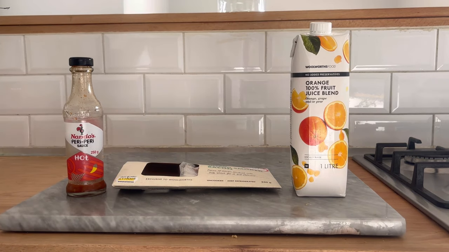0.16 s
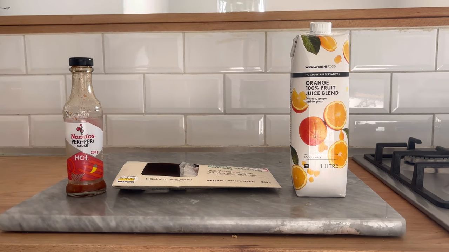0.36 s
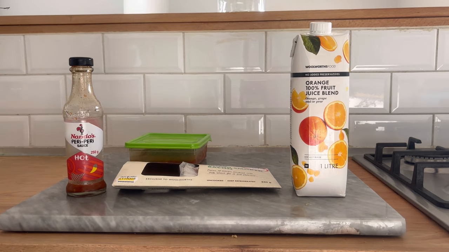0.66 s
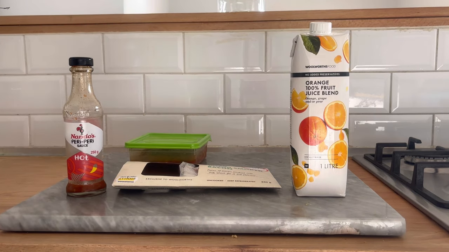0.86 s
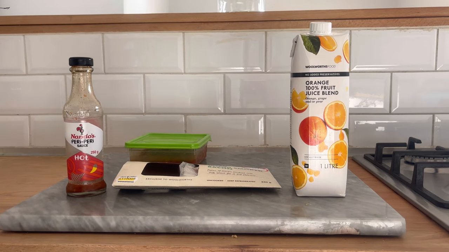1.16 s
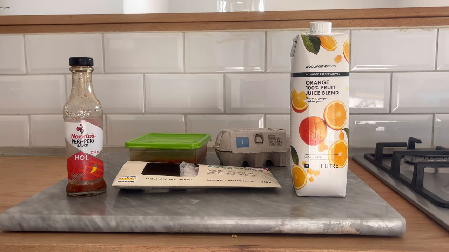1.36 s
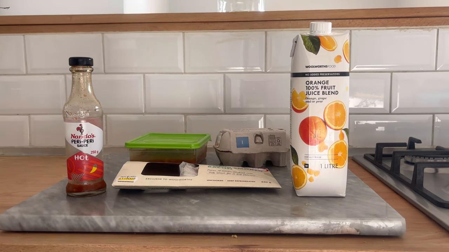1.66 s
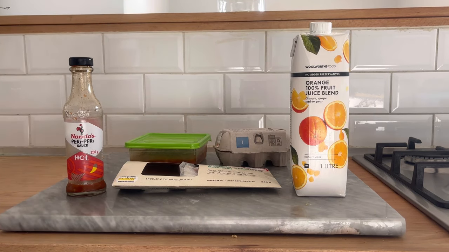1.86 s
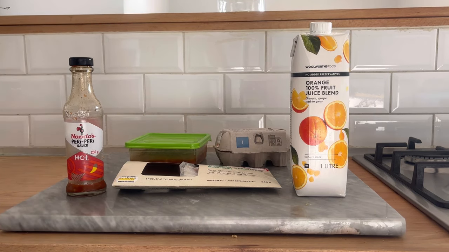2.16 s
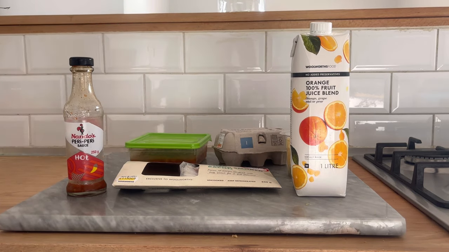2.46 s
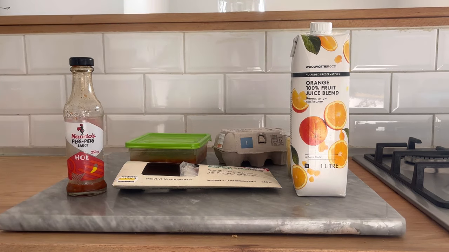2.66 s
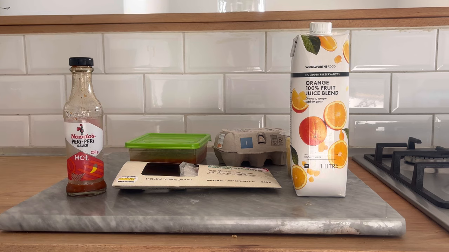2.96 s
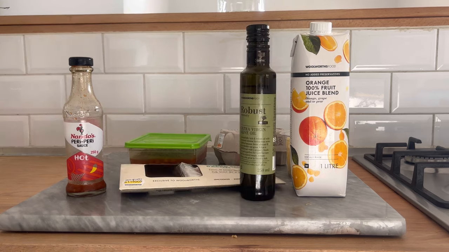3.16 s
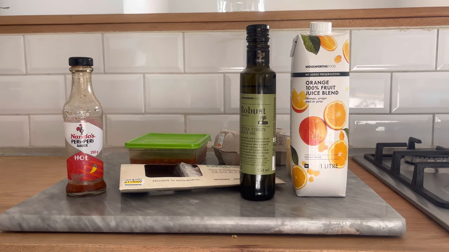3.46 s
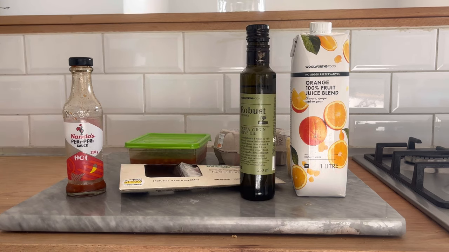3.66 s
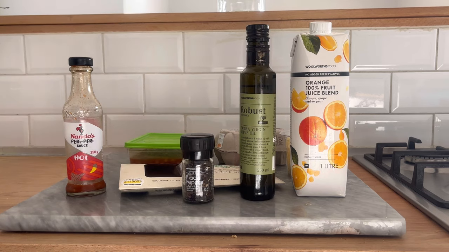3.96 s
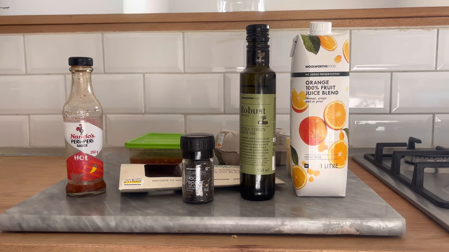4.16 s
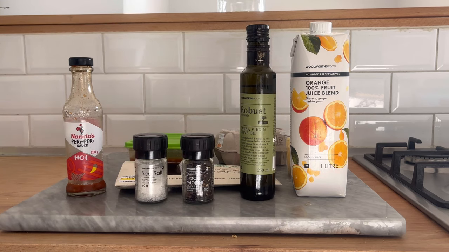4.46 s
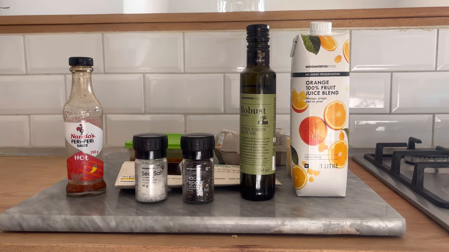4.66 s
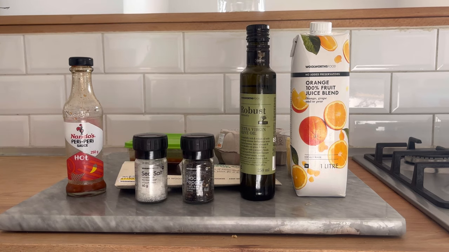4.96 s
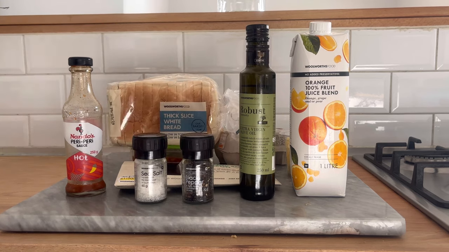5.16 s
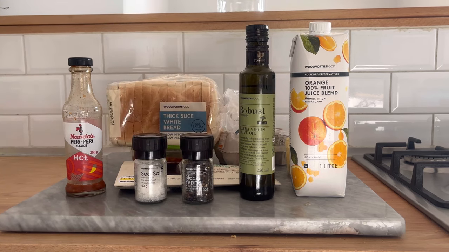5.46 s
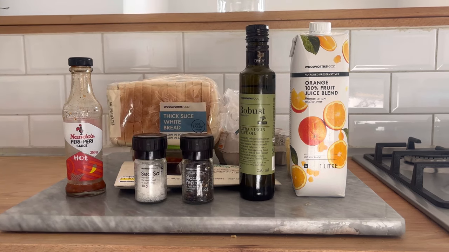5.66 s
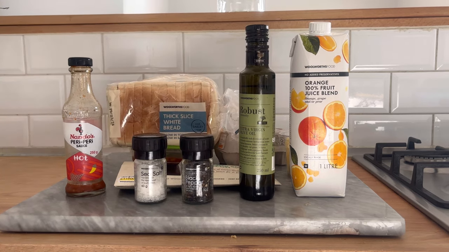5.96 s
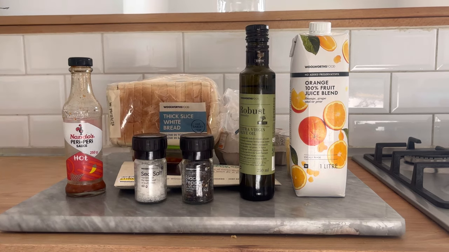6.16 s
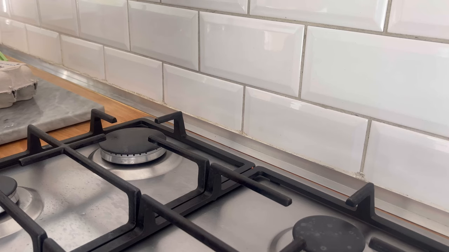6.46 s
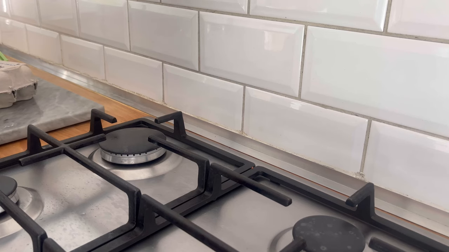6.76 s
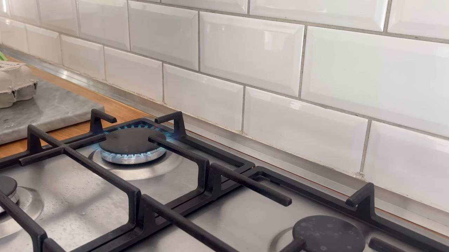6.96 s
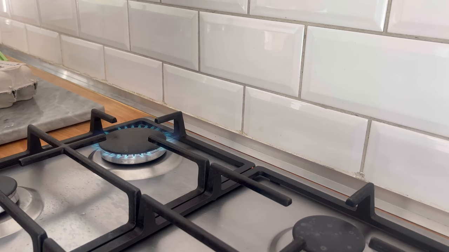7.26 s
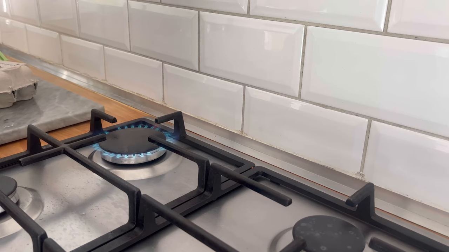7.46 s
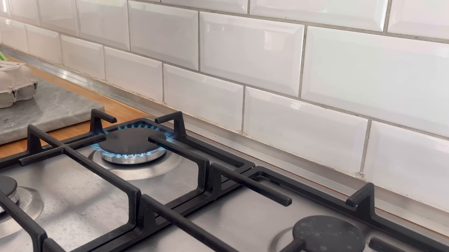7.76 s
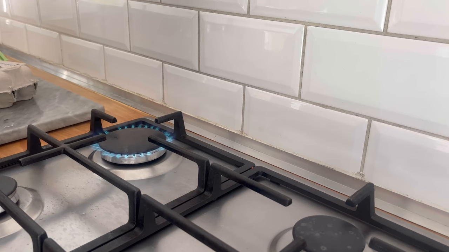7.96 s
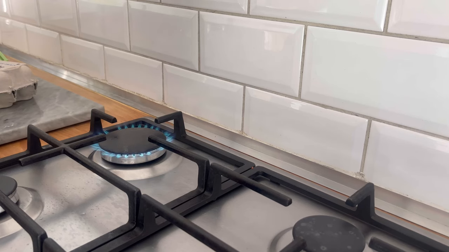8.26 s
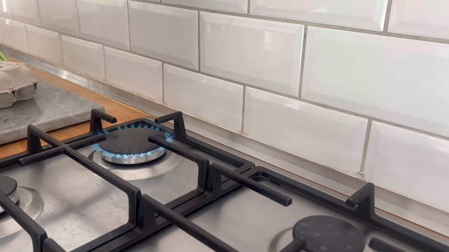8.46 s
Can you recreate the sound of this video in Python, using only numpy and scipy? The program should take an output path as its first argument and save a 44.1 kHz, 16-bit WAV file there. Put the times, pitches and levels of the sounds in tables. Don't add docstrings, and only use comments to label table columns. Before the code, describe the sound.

Close kitchen foley in hard-cut takes over faint room tone. At 0.1 s a fridge door seal lets go with a crisp snap, and the cabinet booms briefly. From 0.5 to 1 s a lidded box and packs snap, scrape and knock hollowly on a stone slab, with a firm thud and rustle at 1.2 s. It is nearly quiet until small clicks at 2.3-2.5 s and a soft low set-down at 2.7 s. At 3.1-3.3 s a tub and carton knock; at 3.55 and 3.8 s glass clinks with short damped rings. From 4.8 to 6.1 s a bread bag thumps softly, crinkles and crackles. At 6.2 s gas hisses with a faint tube hum; from 6.3 s loud, bright igniter clicks repeat every 0.26 s, ringing off metal and tiles. Around 6.9 s flame catches with a low whump, then roars softly to the end, with small knocks near 8.4 s.

```python
import sys
import numpy as np
from scipy import signal
from scipy.fft import rfft, irfft, next_fast_len
from scipy.io import wavfile
from scipy.ndimage import uniform_filter1d

SR = 44100
rng = np.random.default_rng(int(sys.argv[2]) if len(sys.argv) > 2 else 0)


def digitize_waveform(pressure):
    field = np.atleast_2d(pressure).T
    bounded = np.clip(field, -1, 1)
    quanta = np.round(bounded * 32767).astype(np.int16)
    wavfile.write(sys.argv[1], SR, quanta)


def boost_factor(decibels):
    exponent = np.asarray(decibels, float) / 20
    return 10 ** exponent


N = 380134
T = np.arange(N) / SR

TAKE_STARTS = [.4595, 1.36, 2.206, 3.028, 3.883, 4.44, 5.089, 6.202]

# start_s, knock_db, rumble_over_knock_db, t60_s
BUMPS = [(0, -54, 1.5, 2.6), (0.099, -43.5, -9, 0.67), (0.469, -52, -5, 9), (.495, -46, -9, 2),
         (.58, -41, -3, 0.91), (.862, -48, -8, 1.7), (1.216, -41.5, -13, 0.46), (1.235, -43.5, -2.5, 1.1),
         (1.38, -74.5, -4, 10), (2.168, -62, -23, 2), (2.215, -58.5, 3.5, 4.8), (2.741, -59, 12, .45),
         (3.072, -61.5, 0, 2), (3.103, -54, -7, 0.92), (3.3, -48, -12, .8), (3.345, -50, 1.5, 0.77),
         (3.567, -59, 5, 0.9), (3.79, -51.5, 1, 1), (3.83, -47, 4, 1.9), (3.89, -58.5, -22, 0.73),
         (4.05, -71.5, -3, 4.3), (4.46, -77, 2, 30), (4.8, -54, -15, 2), (4.846, -46, -5, 5),
         (4.89, -43, -4.5, 0.81), (5.097, -54, 3, 2), (5.243, -51.5, 2, 1.47), (5.49, -60.5, 5, 8.2),
         (5.87, -52.5, 1, 0.83)]
# peak_s, scrape_db,
# rustle_over_scrape_db, climb_20db_s, t60_s
SLIDES = [(0, -54, 0, .01, 3.2), (.096, -40, -2, 0.13, 0.66), (.508, -41.5, -4.5, 0.04, 0.22),
          (.531, -47.5, -5, .1, 2), (.558, -42, -7, .04, .25), (.6, -45.5, -6, 0.08, 0.5),
          (.656, -50, -5.5, .2, 2), (.709, -43, -5, .03, .35), (.755, -44, -5, .15, 0.45),
          (.866, -45.5, -7, 0.04, 1), (.96, -48.5, -1.5, -2.8, 0.64), (1.213, -47.5, 0, .002, 0.23),
          (1.355, -49, -1, .5, 1), (1.79, -81, 2.5, .5, 2.1), (2.17, -54.5, 0.5, .004, 9),
          (2.23, -71.5, -6.5, .05, 4.3), (2.53, -72, 1, 0.2, 1), (2.715, -54, -5.5, 0.26, 0.38),
          (2.94, -72.5, 1.5, 0.5, 1.5),
          (3.105, -66, -0.5, 0.07, 0.91), (3.297, -60.5, -5, 0.0033, 0.51),
                 (3.56, -58.5, -9, 0.017, .9), (3.786, -52, -23, .004, 0.68),
                 (3.837, -54, -22, 0.058, 0.33), (3.9, -73.5, 3, 0.043, 0.95), (4.05, -84.5, 9, .01, 1),
                 (4.47, -86.5, 4, .02, 1.5),
          (4.8, -65.5, -17, .01, .6), (4.843, -58, -7, .01, 1.1), (4.904, -49.5, 1.5, 0.09, 0.42),
              (5.085, -54, 2.5, 0.22, 1.1), (5.132, -63.5, 0.5, 0.13, 0.93), (5.243, -56.5, -1, .04, 1.9),
              (5.5, -56.5, 0, 0.036, 3), (5.61, -46, -4, 0.16, 1), (5.8, -45, -7.5, 0.22, 1.3),
              (5.891, -42.5, -7, 0.21, 0.47), (5.99, -56.5, -6.5, .1, 1.75)]
# freq_hz, level_db_per_hz
RUMBLE_COLOUR = [(35, -36.5), (65, -3.5), (100, -4), (200, -6), (300, -7), (500, -58)]
KNOCK_COLOUR = [(130, -31), (250, 1), (600, -2), (1200, -6.5), (3500, -35.5)]
SCRAPE_COLOUR = [(600, -32.5), (1500, 0.5), (3000, 1), (5500, -4.5), (12000, -29)]
RUSTLE_COLOUR = [(3000, -18), (6500, 5.5), (10000, 5), (14000, -26)]
SHEEN_COLOUR = [(8000, -18.5), (11500, -3.5), (15700, -6.5), (16200, -41.5)]
# freq_hz, level_db_per_hz
CRINKLE_COLOUR = [(700, -27), (1700, -2.5), (3300, 0), (5000, -1), (12000, -26)]

# freq_hz, width_hz, level_db
CABINET_MODES = [(326, 30, 5), (247, 45, -3), (190, 15, -6.5), (1480, 90, -17.5), (800, 60, -20.5)]
# time_s, level_db
CABINET_LEVEL = [(0.0, -43.5), (0.188, -42), (0.2, -37), (0.34, -48.5), (0.459, -60)]

# freq_hz, level_db_per_hz
AIR_COLOUR = [(24, -41.5), (40, -5), (99, -0.5), (354, -24), (444, -9.5), (620, -24.5), (6650, -31),
              (16000, -44.5)]

# start_s, peak_db, centre_hz
SNAPS = [(0.0654, -27, 9000), (0.0685, -26, 4000), (0.0866, -11.5, 10300), (0.0905, -16, 9500),
         (0.0905, -24, 4500), (0.091, -24.5, 1600), (0.4394, -55, 3200), (0.4992, -34.5, 1200),
         (0.5047, -33.5, 1500), (0.569, -30, 1100), (0.61, -33, 3000), (0.7028, -33.5, 1100),
         (0.7555, -35, 5000), (0.8592, -33, 1050), (0.893, -36, 3200), (0.5586, -29, 2620),
         (0.5942, -31.5, 3350), (0.7464, -36, 3410), (1.215, -33, 5380), (1.3025, -37, 3730),
         (1.3437, -35, 2800), (1.3517, -32.5, 3000), (1.79, -53.5, 4000), (2.2702, -52, 3190),
         (2.3575, -49.5, 3440), (2.4319, -42.5, 5470), (2.5174, -51, 6130), (2.5274, -41, 4910),
         (2.5394, -45, 5740), (2.9303, -52, 4570), (2.9372, -47, 4030), (3.88, -41, 3560),
         (4.8445, -44, 11400), (4.8894, -31, 13200), (4.891, -35, 6500), (5.2276, -36, 6500),
         (5.2666, -37.5, 10200), (5.2918, -35, 5500), (5.3328, -38, 4050), (5.4946, -44, 2300),
         (5.5047, -43, 2300), (5.5127, -41, 4680), (5.515, -41.5, 2300), (5.59, -35, 3700),
         (5.701, -38, 6500), (5.81, -34, 4500), (5.889, -37, 5000), (6.101, -39, 6000)]
# start_s, peak_db, pitch_hz,
# t60_s, stops_after_s
THUDS = [(1.214, -34, 580, 0.068, .05), (1.227, -29.5, 100, 0.1, 0.046), (1.216, -35.5, 940, .04, .012),
         (1.302, -36.5, 830, 0.05, 0.012), (2.737, -37.5, 98, 0.65, 0.086), (3.298, -40, 710, 0.13, .1),
         (3.834, -38, 115, 0.26, 0.051), (5.255, -42, 117, 0.35, 0.13), (5.416, -38, 300, 0.054, .04),
         (5.874, -37, 216, 0.084, 0.055), (8.389, -42, 1050, .1, 0.017), (8.392, -45.5, 550, .1, 0.019),
         (8.4, -38, 226, 0.22, 0.035), (8.455, -42, 130, .3, .03), (8.476, -40, 1160, .04, .012),
         (8.484, -41, 580, 0.067, .015), (6.858, -30.5, 435, 0.055, 0.014), (6.888, -27, 148, .2, 0.016),
         (6.905, -22.5, 166, .12, .02), (6.933, -28.5, 169, .3, .045), (6.932, -41, 1390, .06, .012),
         (3.068, -51.5, 322, .4, 0.032), (3.105, -48, 330, .3, .06), (.473, -49, 780, .3, .02)]

# time_s, pitch_hz, level_db
BOX_HOLLOW = [(.545, 2600, -55), (.558, 2318, -39), (.572, 1188, -39.5), (.59, 599, -41.5), (.64, 503, -56),
              (.76, 866, -43.5), (.85, 1000, -55), (.865, 1043, -44), (.91, 1020, -56)]
LID_RIM = [(.69, 3050, -66), (.71, 3100, -55), (.74, 3250, -52), (.77, 3250, -54), (.8, 3200, -66)]
BAG_SQUEAK = [(4.63, 2680, -98), (4.68, 2660, -84), (4.76, 2600, -82), (4.81, 2520, -77), (4.83, 2500, -95)]
BAG_POCKET = [(5.55, 4000, -68), (5.6, 3700, -50), (5.64, 3500, -54), (5.68, 3300, -66), (5.75, 3200, -53),
              (5.8, 3200, -46.5), (5.845, 2500, -53), (5.9, 2300, -55), (5.94, 2200, -68)]
BAG_CREASE = [(5.52, 2300, -66), (5.58, 2260, -55), (5.63, 1900, -54), (5.67, 1890, -66)]

# freq_hz, level_db
BOTTLE_MODES = [(1690, -7), (1922, -5), (2080, -9), (2374, -3), (2575, -8), (2729, -8), (2893, -9),
                (3725, 2.5), (4727, -5), (4781, -5), (5464, -11), (6815, -8), (7084, -1), (11160, -14)]
JAR_MODES = [(1195, 4), (1750, 0), (2525, -1), (3068, -3), (8500, -10), (9100, -6), (9500, -1), (9850, -8),
             (10500, -12), (11300, -17)]
TUB_MODES = [(1350, 2), (2300, 2.5), (2580, -5), (3500, -8), (6900, -10)]
NECK_MODES = [(4780, 1), (5480, -21), (7080, -7), (13900, -18)]
SHOULDER_MODES = [(8800, -3), (9100, -4), (9450, 2), (9800, -2), (11900, -3), (12100, -4), (12600, -2),
                  (13900, -10), (14590, -8)]
CARTON_MODES = [(285, -9), (388, -4.5), (732, 0.5), (974, -5), (1136, -9), (1453, -11), (2223, -12)]
BLUR_HZ = [170, 450, 300, 100, 300, 90]
STEADY_SHARE = [.7, .2, .4, 1.1, .3, .8]
# start_s, level_db, rise_s, t60_s, object_index (1.5 rounds to tub)
CLINKS = [
    (3.101, -61.5, 0.009, 0.24, 2),
    (3.297, -60, 0.0022, 0.28, 2),
    (3.297, -51, .002, .3, 5),
    (3.549, -51, 0.011, 0.47, 0),
    (3.55, -61, 0.011, 0.47, 4),
    (3.79, -65, .01, .5, 4),
    (3.786, -54, 0.0083, 0.88, 3),
    (3.787, -50.5, 0.0062, 0.46, 1.5),
    (3.824, -43, 0.005, 0.37, 1),
    (3.889, -65, 0.0082, 0.54, 2),
]

# time_s, hiss_db
GAS_FLOW = [(6.202, -45), (6.22, -44), (6.25, -45.5), (6.3, -50), (6.6, -50), (7.3, -57.5), (8.62, -56)]
# freq_hz, level_db_per_hz
HISS_COLOUR = [(880, -37), (1500, -12.5), (3090, -11), (3380, -6.5), (5170, -4.5), (8920, 2), (16000, -27)]
# freq_hz, width_hz, level_db
TUBE_MODES = [(1235, 310, 0), (431, 32, -4)]
# peak_s, roar_db, flutter_over_roar_db,
# climb_20db_s, t60_s
FLAME_PUFFS = [(6.3, -71, 6, .1, 30), (6.862, -38.5, -4.5, 0.02, 0.5), (6.905, -31.5, -9.5, 0.6, 0.68),
               (6.96, -34, -5.5, 0.3, 0.27), (8.05, -61, -1, 1.5, 0.84), (8.398, -52, 3, 0.03, 0.12),
               (8.482, -53, 3, 0.04, 0.12), (8.6, -46.5, -13, 2, 3)]
# freq_hz, level_db_per_hz
ROAR_COLOUR = [(18, -55), (30, -40.5), (70, -1), (119, 2.5), (200, -2.5), (312, -10.5), (520, -17.5),
               (880, -120)]
FLUTTER_COLOUR = [(200, -35.5), (330, -2), (600, -8), (1000, -10), (1600, -12.5), (3500, -31)]

# start_s, peak_db
SPARKS = [(6.3065, 0), (6.5824, 0), (6.8439, 1), (7.1042, -0.5), (7.365, -0.55), (7.6407, -0.7),
          (7.902, -0.5), (8.163, -0.4), (8.4391, -1)]
# freq_hz, level_db_per_hz
SPARK_COLOUR = [(300, -100), (1000, -31), (1800, -29), (2200, -12.5), (3530, -11), (10400, -10),
                (15800, -11), (16900, -14)]
# delay_ms, level_db
GRATE_ECHOES = [(0.0, 2.5), (0.158, 3.5), (0.279, -3.5), (0.518, 3.5), (0.84, -9), (1.119, 5.115),
                (1.314, 1.4), (1.776, -3.5), (1.966, -5), (2.526, -8), (2.676, -3.5), (3.531, -5),
                (4.243, -5), (4.864, -11)]
# freq_hz, width_hz, level_db
CAP_MODES = [(9569.84, 220.0, 12.5), (8250, 200, 4.5), (12095.5, 590, 7.041), (6480, 320, 7.695),
             (15900, 500.0, 4), (4853.32, 910, 4)]
# time_ms, level_db
WALL_BUILD = [(0, -14.5), (5, -30), (8, -40), (11, -34), (13, -29.5), (17, -28), (19.5, -33), (21.5, -33.5),
              (22.8, -26), (27, -30), (40, -31), (70, -30.5)]
# freq_hz, t60_s
ROOM_T60 = [(500, 1), (2000, 0.7), (5000, 0.67), (10000, 0.6), (16000, 0.5)]
# freq_hz, level_db_per_hz
ROOM_COLOUR = [(350, -33), (600, -29.5), (1250, -17), (2090, -14.5), (3170, -11.5), (9610, 0.5),
               (15600, -13.5), (16500, -44)]


def unit(x):
    return x / np.sqrt(np.mean(x ** 2) + 1e-20)


def along(points, hz):
    f, v = np.transpose(points)
    return np.interp(np.log(hz + 1), np.log(f + 1), v)


def level(time_s, level_db):
    return boost_factor(np.interp(T, time_s, level_db, left=-150, right=-150))


def wobble(rate_hz):
    count = int(N * rate_hz / SR) + 2
    return np.interp(T * rate_hz, np.arange(count), rng.standard_normal(count))


def filtered(x, response):
    m = next_fast_len(len(x) + SR // 8, real=True)
    return irfft(rfft(x, m) * response(np.fft.rfftfreq(m, 1 / SR)), m)[:len(x)]


def resonances(peaks):
    def response(f):
        total = 0
        for k, (centre, width, db) in enumerate(peaks):
            total = total + (-1) ** k * boost_factor(db) * 1j * f * width / (centre * centre - f * f + 1j * f * width)
        return total
    return response


def noise(colour, grit=1., white=None):
    white = rng.standard_normal(N) if white is None else white
    return unit(filtered(grit * white, lambda hz: boost_factor(along(colour, hz))))


def patches(depth_db):
    z = signal.stft(rng.standard_normal(N), nperseg=512)[2]
    field = uniform_filter1d(rng.standard_normal(z.shape), 3, 0)
    field = uniform_filter1d(field, 5, 1)
    return signal.istft(z * boost_factor(depth_db * unit(field)), nperseg=512)[1][:N]


def swells(rows, second_fades):
    s, db, over_db, rise, t60 = np.transpose(rows)[:, :, None]
    t = T[::32]
    before = np.append(-1, s[:-1])[:, None]
    after = np.append(s[1:], np.inf)[:, None]
    same_take = np.searchsorted(TAKE_STARTS, t) == np.searchsorted(TAKE_STARTS, s)
    live = same_take & (t >= before) & (t < after)

    def gain(peak_db, fades):
        shape_db = np.where(t < s, 20 * (t - s) / rise, -60 * fades * (t - s) / t60).clip(-90)
        power = np.sum(live * boost_factor(2 * (peak_db + shape_db)), axis=0) + 1e-14
        return np.interp(T, t, np.sqrt(power))

    return [gain(db, 0.99), gain(db + over_db, second_fades)]


def take_end(s):
    return min(c for c in TAKE_STARTS if c > s)


def add(x, s, piece):
    part = x[round(s * SR):][:len(piece)]
    part += piece[:len(part)]


def handling():
    climb_20db_s, drag_db, bag_s = 0.0068, -14.5, 5.47
    bumps = [(s, db, boom_db, climb_20db_s, t60) for s, db, boom_db, t60 in BUMPS]
    knock, rumble = swells(bumps, second_fades=.9)
    slides = np.array(SLIDES)
    scrape, rustle = swells(slides, second_fades=1.28)
    sheen = rustle * (rustle / scrape) ** .5 * boost_factor(-0.8)

    slips = wobble(60)
    body = patches(depth_db=2.5)
    film = boost_factor(1.3 * slips + 1.3 * wobble(700))
    grit = boost_factor(.5 * slips + 1.4 * wobble(400))
    lumps = boost_factor(.8 * slips + .8 * wobble(120))

    surface = np.where(T < bag_s, noise(SCRAPE_COLOUR, grit, body), noise(CRINKLE_COLOUR, grit, body))
    treble = scrape * surface
    treble += rustle * boost_factor(-1) * noise(RUSTLE_COLOUR, film)
    treble += sheen * noise(SHEEN_COLOUR, film)
    shaken = np.hypot(knock, boost_factor(drag_db) * scrape)
    knocking = shaken * noise(KNOCK_COLOUR, lumps, body)
    return rumble * noise(RUMBLE_COLOUR, boost_factor(3.3 * wobble(30))) + knocking + treble


def fridge():
    boom = unit(filtered(rng.standard_normal(N), resonances(CABINET_MODES)))
    return level(*np.transpose(CABINET_LEVEL)) * boost_factor(-1.5) * boom


def room_tone():
    return boost_factor(-71) * noise(AIR_COLOUR)


def snaps():
    out, t = np.zeros(N), T[:SR // 8]
    t60_s, crisp_db = 0.019, -21
    for s, db, hz in SNAPS:
        burst = rng.standard_normal(len(t)) * boost_factor(-60 * t / t60_s)
        edge = boost_factor(crisp_db) * np.diff(burst, prepend=0)
        burst = edge + filtered(burst, resonances([(hz, 0.52 * hz, 4)]))
        add(out, s, boost_factor(db) * burst / np.abs(burst).max() * (s + t < take_end(s)))
    return out


def thuds():
    out, t = np.zeros(N), T[:SR // 8]
    release_s = 0.0039
    for s, db, hz, t60, held in THUDS:
        drift = 1.84 * uniform_filter1d(rng.standard_normal(len(t)), 300)
        phase_s = np.cumsum(1 + drift) / SR
        attack = 1 - np.exp(-t * hz * 4)
        shape = boost_factor(db - 60 * t / t60) * attack * np.clip((held - t) / release_s, 0, 1)
        add(out, s, shape * np.sin(2 * np.pi * hz * phase_s))
    return out


def hollow(rows, width_hz):
    s, hz, db = np.transpose(rows)
    carrier = np.cumsum(2 * np.pi * np.interp(T, s, hz) / SR)
    band = wobble(width_hz) * np.cos(carrier) + wobble(width_hz) * np.sin(carrier)
    return level(s, db) * unit(band)


def lidded_box():
    cavity = boost_factor(2.1 * wobble(160)) * hollow(BOX_HOLLOW, width_hz=400)
    return cavity + hollow(LID_RIM, width_hz=300)


def glass():
    out, t = np.zeros(N), T[:SR // 3]
    objects = (BOTTLE_MODES, JAR_MODES, TUB_MODES, NECK_MODES, SHOULDER_MODES, CARTON_MODES)
    for s, db, rise, t60, which in CLINKS:
        k = round(which)
        hz, mode_db = np.transpose(objects[k])[:, :, None]
        knots = rng.standard_normal((2, len(hz), 320))
        a, b = ([np.interp(t * BLUR_HZ[k], np.arange(len(row)), row) for row in rows] for rows in knots)
        phase = 2 * np.pi * hz * t
        lines = np.add(a, STEADY_SHARE[k]) * np.cos(phase) + b * np.sin(phase)
        decay_db = -60 * t / t60 * (hz / 4000) ** 0.29
        ring = np.sum(boost_factor(db + mode_db + decay_db) * lines, axis=0)
        add(out, s, ring * (1 - np.exp(-t / rise)) * (s + t < take_end(s)))
    return out


def bread_bag():
    squeak = hollow(BAG_SQUEAK, width_hz=240)
    return squeak + hollow(BAG_POCKET, width_hz=900) + hollow(BAG_CREASE, width_hz=350)


def burner():
    lit_s, burn_db, burn_flutter_db = 6.98, -49.5, -68
    hiss = level(*np.transpose(GAS_FLOW)) * noise(HISS_COLOUR)

    tube_response = resonances(TUBE_MODES)
    tube = unit(filtered(rng.standard_normal(N), lambda f: tube_response(f) ** 2))
    hum = boost_factor(-59.5 + 0.51 * wobble(16)) * np.clip((T - 6.25) / 0.13, 0, 1) * tube

    puffs = swells(FLAME_PUFFS, second_fades=0.95)
    roar, flutter = np.hypot(puffs, boost_factor([[burn_db], [burn_flutter_db]]) * (T > lit_s))
    flame = roar * noise(ROAR_COLOUR, boost_factor(2.1 * wobble(25)))
    flame += flutter * noise(FLUTTER_COLOUR, boost_factor(2.6 * wobble(40)))
    return hiss + hum + flame


def causal(colour):
    cep = irfft(np.log(boost_factor(along(colour, np.fft.rfftfreq(2048, 1 / SR))) + 1e-6))
    cep[1:1024] *= 2
    cep[1025:] = 0
    return irfft(np.exp(rfft(cep)))[:512]


def room_tail():
    hz, t, z = signal.stft(rng.standard_normal(SR // 2), SR, nperseg=256)
    gain_db = along(ROOM_COLOUR, hz)[:, None] - 60 * t / along(ROOM_T60, hz)[:, None]
    tail = signal.istft(z * boost_factor(gain_db), SR, nperseg=256)[1]
    return tail / np.sqrt(np.mean(tail[:2000] ** 2))


def igniter():
    out = np.zeros(N)
    ms, db = np.transpose(GRATE_ECHOES)
    pulse, same_tail = causal(SPARK_COLOUR), room_tail()
    cap = resonances(CAP_MODES)
    build_ms, build_db = np.transpose(WALL_BUILD)
    build = boost_factor(np.interp(T[:len(same_tail)] * 1000, build_ms, build_db))
    for s, peak_db in SPARKS:
        wander = rng.standard_normal((2, len(ms)))
        delay_s = (ms + 0.0016 * wander[0]) / 1000
        size = boost_factor(db + 0.74 * wander[1])

        def near(f):
            echoes = np.exp(-2j * np.pi * f[:, None] * delay_s) @ size
            return echoes * (1 + cap(f))

        crack = filtered(np.pad(pulse, (0, 600)), near)
        crack *= boost_factor(np.interp(T[:len(crack)], [0, .0026, .0034, .008], [0.5, 3, -8, -9]))
        add(out, s, boost_factor(peak_db - 19) * unit(crack))
        tail = 0.51 * same_tail + 0.63 * room_tail()
        add(out, s, boost_factor(peak_db + 3.5) * build * tail)
    return out


def scene():
    mix = handling() + fridge() + room_tone() + snaps() + thuds()
    mix += lidded_box() + glass() + bread_bag()
    mix += burner() + igniter()
    starts = np.append(-1, TAKE_STARTS)
    since_s = T - starts[np.searchsorted(TAKE_STARTS, T, side="right")]
    return (mix * np.clip(since_s / 0.03, .12, 1))[None]


def roll_off(x):
    return signal.sosfilt(signal.butter(12, 17110, fs=SR, output="sos"), x)


def record(dry):
    mic = [(20, -20), (55, -1.5), (15700, -0.5), (15900, -14), (16900, -14), (17300, -51)]  # freq_hz, level_db
    band = filtered(np.clip(dry[0], -1, 1), lambda hz: boost_factor(along(mic, hz)))
    return roll_off(band[None])


dry = scene()
out = record(dry)
digitize_waveform(out)
```